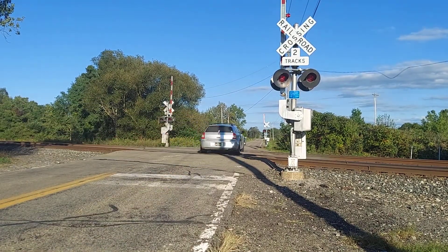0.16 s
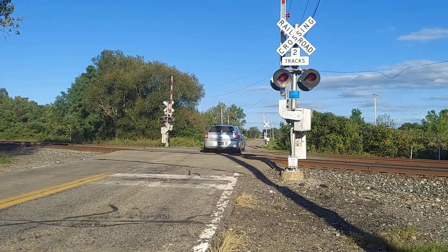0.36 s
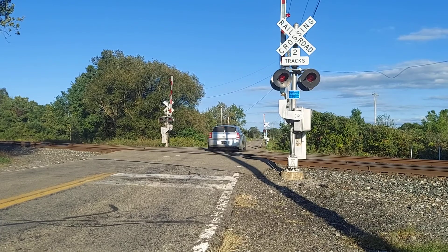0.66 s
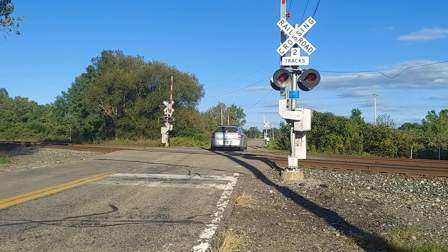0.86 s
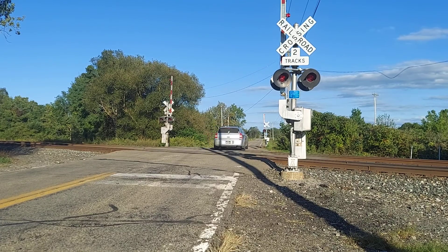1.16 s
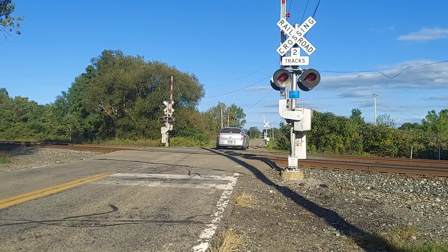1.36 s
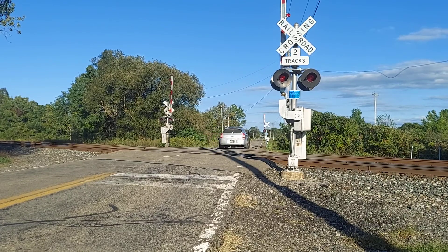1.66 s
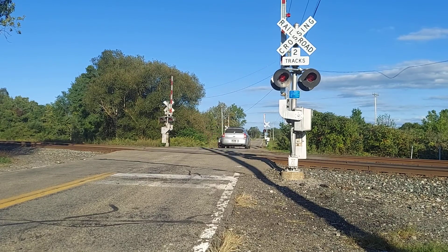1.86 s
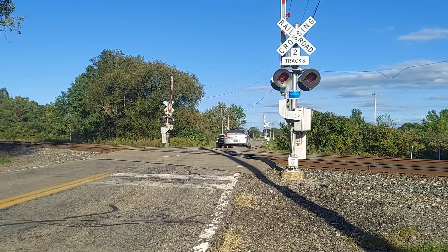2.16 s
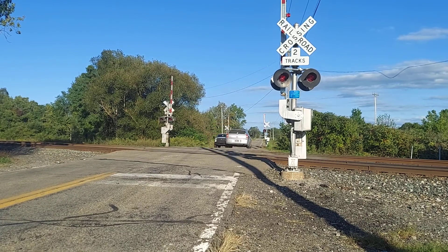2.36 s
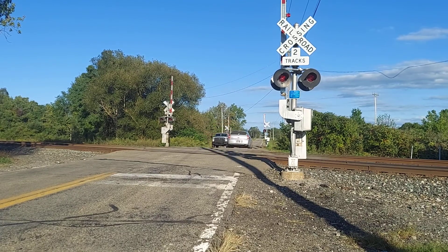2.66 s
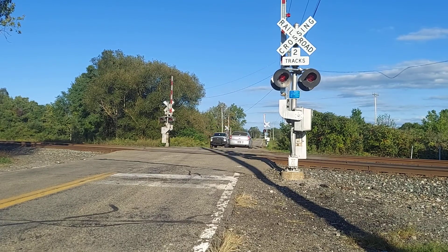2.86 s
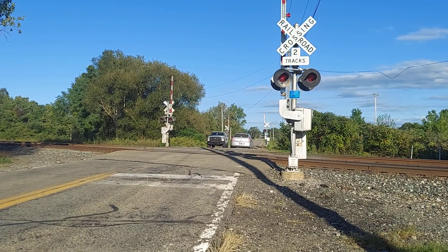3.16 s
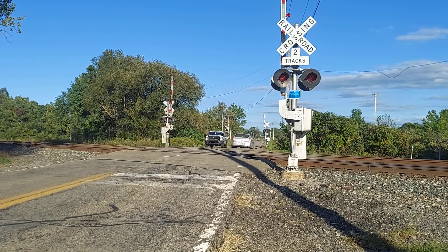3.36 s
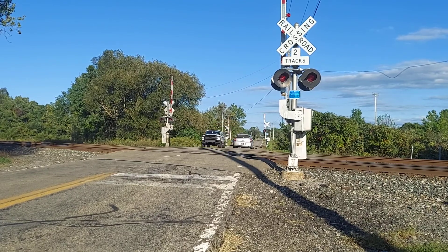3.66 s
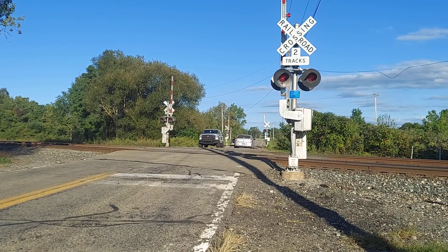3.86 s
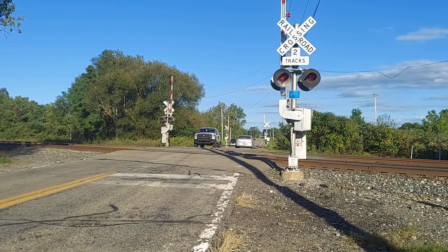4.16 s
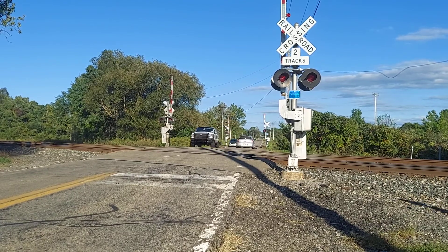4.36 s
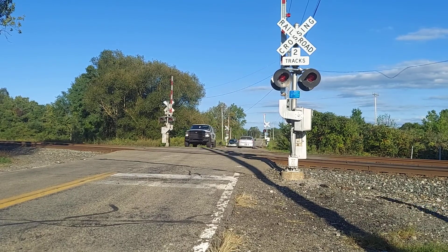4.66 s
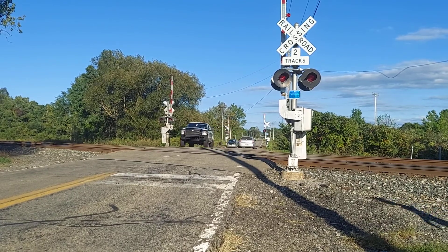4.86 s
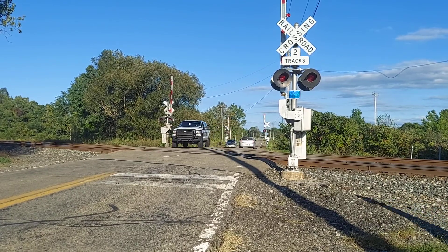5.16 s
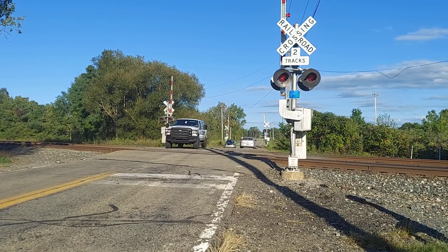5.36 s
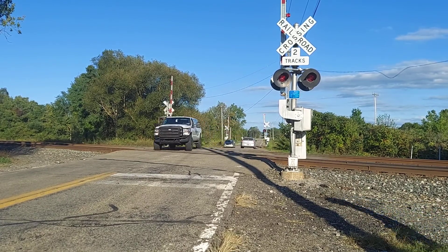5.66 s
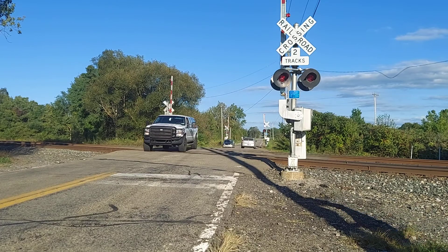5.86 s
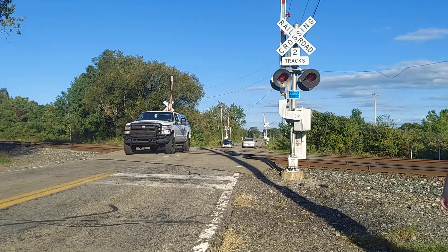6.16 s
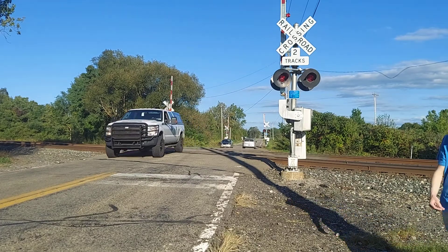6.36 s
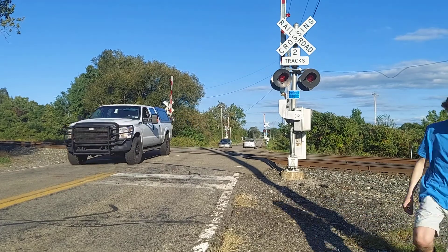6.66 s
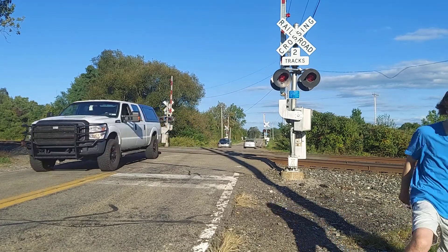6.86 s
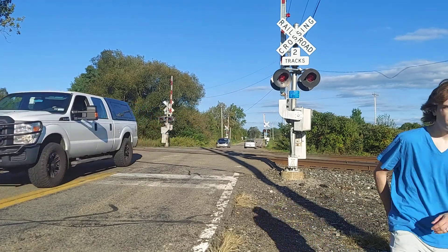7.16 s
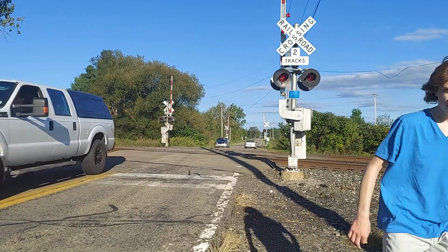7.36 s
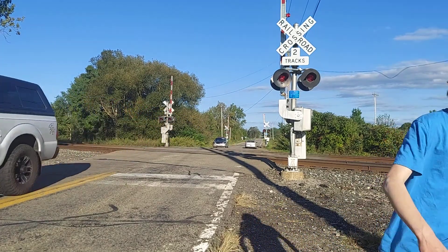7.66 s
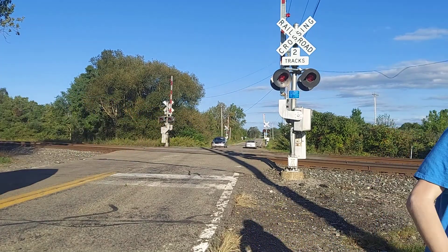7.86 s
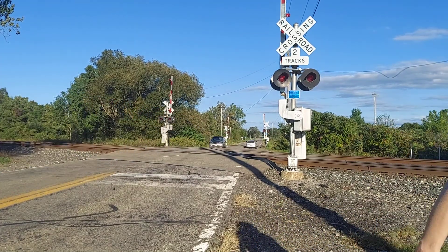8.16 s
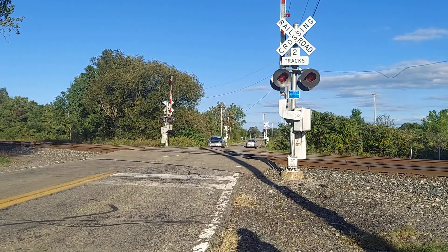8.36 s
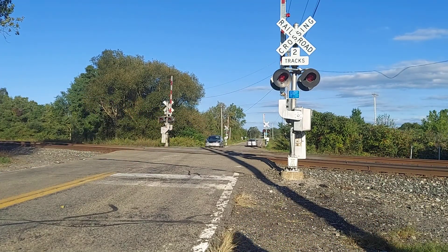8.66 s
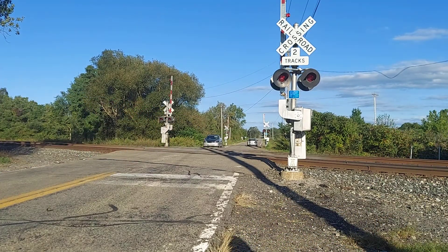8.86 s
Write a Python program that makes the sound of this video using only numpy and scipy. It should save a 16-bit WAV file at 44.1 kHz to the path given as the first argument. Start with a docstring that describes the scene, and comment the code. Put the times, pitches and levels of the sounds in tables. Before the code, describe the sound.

A few crunching gravel steps and small stone taps sound close to the microphone, over soft insects and a departing car on a rural road. Then a pickup truck draws near with rising rumble and tyre noise, clanks and thuds across the railroad tracks and goes by on the left. Its deep exhaust drone is loudest as it starts pulling away.

```python
"""Country road at a level crossing. A car has left; a pickup truck rolls over the rails and passes close
on the left. Tyres roar, wheels thump, the body clanks; the exhaust hums once the tail is near.
Crickets and katydids scrape their wings in the verge. On the right, steps crunch on gravel and stones
knock the stand of a small two-port microphone."""
import sys
import numpy as np
from scipy import signal
from scipy.fft import rfft, irfft
from scipy.io import wavfile
from scipy.ndimage import map_coordinates

SR = 44100
rng = np.random.default_rng(int(sys.argv[2]) if len(sys.argv) > 2 else 0)


def generate_wav(sig):
    """Save sig (samples, or channels by samples) to the path in sys.argv[1] as 16-bit PCM at SR."""
    pcm = np.round(np.clip(np.atleast_2d(sig).T, -1, 1) * 32767).astype(np.int16)
    wavfile.write(sys.argv[1], SR, pcm)


N = 396900

# noise spectra: (frequency [Hz], relative density [dB])
HUSH_SPECTRUM = [(18, -52), (30, -24), (66, 3.5), (123, -0.5), (197, -17.5), (243, -12), (324, -28),
                 (506, -8), (711, -24.5), (1260, -70), (1520, -26), (3160, -37), (4100, -24.5),
                 (4670, -33.5), (15600, -69)]
CAR_SPECTRUM = [(16, -29), (28, 7), (53, 6.5), (92, -9), (123, 5), (177, -23), (288, -7), (325, -14),
                (700, -27), (910, -62), (1540, -120)]
RUMBLE_SPECTRUM = [(15, -42), (25, -10), (59, 4), (76, 8), (108, 2), (146, 6.5), (185, 2.5), (238, -7.5),
                   (260, -26), (340, -37), (570, -120)]
ROAR_SPECTRUM = [(130, -10.5), (200, -2), (300, 0), (450, 2.5), (650, -2.5), (1000, -8), (1500, -13),
                 (2200, -21), (3000, -54)]
HISS_SPECTRUM = [(1100, 0), (1800, 1.5), (2800, 3.5), (4000, 0.5), (5500, -7.5), (7500, -13), (10000, -23),
                 (13000, -13.5), (15700, -32)]
# scattered sound, unlike at the two ports: (frequency [Hz], level re direct [dB])
SCATTER_SPECTRUM = [(60, -18), (250, -17), (600, -14), (1200, -11), (2000, -6), (3000, -4), (15000, -3)]

# cricket whistles: (time [s], pitch [Hz], level [dB])
TREE_CRICKET = [(0, 4020, -66), (.7, 4020, -62), (.85, 4020, -57.5), (4.4, 4020, -58), (9, 4020, -62)]
GROUND_CRICKET = [(0, 8100, -79), (3.6, 8120, -77), (4.1, 8300, -70), (5.5, 8430, -67), (6.5, 8500, -67),
                  (7.2, 8520, -72), (9, 8520, -77)]
# katydid wing resonances: (frequency [Hz], width [Hz], gain [dB])
WING_MODES = [(12500, 1800, 2.5), (13740, 2200, 5), (15150, 3000, 2.5)]
# ticks before a buzz: (time [s], relative peak [dB])
KATYDID_TICKS = [(1.0485, -51), (1.1179, -47), (1.1907, -52), (1.254, -45), (3.4885, -51), (3.6277, -48),
                 (3.717, -49), (3.7793, -45), (3.8362, -45), (5.444, -50), (5.5089, -48), (5.5762, -51),
                 (5.6366, -46), (5.6935, -44)]
# buzzes near and far: (start [s], end [s], end level [dB])
KATYDID_BUZZES = [(-.7, .22, -57.5), (.1, 1.25, -65), (1.24, 2.31, -54.5), (2, 2.72, -63), (3.8, 4.88, -55),
                  (4.6, 5.8, -63), (5.6, 6.64, -54.5), (6.9, 7.7, -61), (7.45, 8.53, -55), (8.2, 8.75, -63)]

# shoes on gravel: (peak time [s], level [dB], fall [s], centre [Hz])
GRAVEL_CRUNCHES = [(.02, -38.5, 0.078, 3240), (.24, -54, .03, 2490), (.355, -41.5, 0.014, 2570),
                   (.61, -43, 0.016, 3080), (.66, -44.5, .07, 2650), (.71, -50.5, 0.044, 3480),
                   (1.34, -52, 0.046, 2480), (1.372, -49, 0.012, 3020), (1.428, -45.5, .025, 2900),
                   (2.96, -57, .008, 4000), (3.2, -59, .012, 4000), (4.41, -57, .03, 10000),
                   (5.7, -61, .01, 7000), (6.356, -53, .004, 7000), (6.367, -44, 0.007, 7450),
                   (6.49, -53, .03, 7040), (6.676, -51, .006, 10100), (7.008, -47.5, .007, 11500),
                   (7.102, -32.5, .025, 4460), (7.103, -35, 0.03, 11100), (7.18, -46.5, .012, 9900),
                   (7.655, -51, .005, 10000), (7.828, -43, 0.029, 11600), (8.208, -44.5, .005, 11800),
                   (8.405, -45, 0.029, 11300)]
# crunch bandwidth: (centre [Hz], width / centre [ratio])
CRUNCH_WIDTHS = [(3000, 0.38), (9000, 2)]
# stones on the stand: (time [s], level [dB], mode tilt [dB/octave], T60 scale [ratio])
STONE_TAPS = [(.232, -47, -8, 1), (.347, -39.5, -2, .9), (.357, -43, -4, .9), (0.599, -56, 15, .9),
              (0.614, -48, 3, 1), (0.697, -52, 10, 1), (0.782, -33, 2, 0.16), (1.368, -43.5, 1, .9),
              (1.422, -42, -9, 0.85), (1.431, -41, -10, 0.77)]
# stand resonances: (frequency [Hz], gain [dB], T60 [s])
STAND_MODES = [(810, -1, 0.14), (1473, -0.5, 0.043), (1810, 10, 0.031), (2220, 9, 0.074), (2900, 4, 0.048),
               (3340, 8, .04), (5160, -24, .04)]

# traffic bearing: (time [s], left port lead [ms])
TRAFFIC_LEAD = [(0, -0.075), (2, -0.096), (5, -0.033), (6, -0.028), (6.6, 0.032), (7.1, 0.16), (7.5, 0.21),
                (8.2, 0.41), (9, 0.14)]
# leaving car: (time [s], level [dB])
CAR_LEVELS = [(0, -37), (.5, -41.5), (1, -45.5), (1.6, -45), (2.4, -48.5), (4, -56), (9, -66)]
# low traffic hums: (start [s], end [s], start pitch [Hz], end pitch [Hz], level [dB])
TRAFFIC_HUMS = [(-.3, 1.2, 122, 119, -43.5), (1.5, 2.34, 112, 131, -50), (.2, 1.8, 44.4, 48.3, -51),
                (3.4, 5.15, 112, 113, -41), (3.4, 6.2, 73, 77, -42), (5.8, 7.1, 77, 76, -36),
                (7.6, 8.6, 55, 53, -31), (7.7, 9.4, 71, 74, -32)]
# drone from the truck's front: (time [s], pitch [Hz], level [dB])
FRONT_DRONE = [(3.8, 148.3, -47), (5.2, 151, -37.5), (6.1, 151.1, -40), (6.8, 151.6, -27.5),
               (7.6, 151.3, -29.5), (8.3, 159, -31.5), (8.5, 160.2, -33)]
# exhaust, climbing as the truck pulls away: (time [s], firing rate [Hz], level [dB])
EXHAUST_FIRING = [(7.55, 110.9, -40), (7.75, 111.6, -23), (8.1, 113.1, -25), (8.54, 116.5, -16),
                  (9, 116.8, -17.5)]
# orders: (multiple of firing rate [ratio], level re firing note before, after the tail passes [dB])
EXHAUST_ORDERS = [(1.375, -17, -28), (2, -15, -38), (3, -17, -45), (4, -14.5, -25)]
# wheels over rails and joints: (time [s], level [dB])
WHEEL_THUMPS = [(2.02, -30), (2.33, -28), (3.68, -28), (4.72, -27), (5.07, -26), (6.42, -24), (6.955, -18),
                (7.475, -18)]
# body and wheel clanks: (time [s], level [dB], pitch [Hz])
BODY_CLANKS = [(5.901, -15, 560), (5.945, -27, 900), (5.997, -27, 700), (6.051, -25, 404),
               (6.093, -27, 573), (6.381, -23, 425), (6.463, -19, 380), (6.507, -26, 480),
               (7.424, -22, 452), (8.848, -26, 479)]
# truck pass: (time [s], body rumble [dB], tyre roar [dB], engine and tread hiss [dB])
TRUCK_LEVELS = [(0, -46.5, -50, -52.5), (1.4, -47.5, -51.5, -56.5), (2.3, -41, -51.5, -57),
                (2.9, -41, -50.5, -58), (3.7, -40, -45.5, -56), (4.8, -40.5, -39.5, -50),
                (5.6, -36.5, -37, -51), (6.0, -31, -32.5, -44.5), (6.3, -32.5, -32.5, -45),
                (6.7, -31, -30, -44), (7.4, -31, -28, -39.5), (7.95, -27, -26.5, -37), (8.4, -29, -29, -41),
                (9, -33, -32.5, -45)]

# port imbalance: (frequency [Hz], left minus right [dB])
PORT_BALANCE = [(60, 1.0), (92, -1.0), (140, -1.5), (210, 0.0), (330, -0.5), (500, -0.5), (770, 0.0),
                (1170, 1.5), (1790, 2.5), (2740, 5.0), (4190, 5.5), (6410, -1.5), (9810, -18.5),
                (15000, -13.0)]


def from_db(db):
    """Decibels to gain."""
    return 10 ** (np.asarray(db) / 20)


def unit_rms(x):
    """Scale to unit power."""
    return x / np.sqrt(np.mean(x ** 2) + 1e-20)


def curves(rows):
    """Columns of a time table, one value per sample."""
    times_s, *columns = np.transpose(rows)
    return [np.interp(np.arange(N) / SR, times_s, column) for column in columns]


def fade_in(end_s, length_s):
    """Quadratic rise from 0 to 1."""
    return np.clip((np.arange(N) / SR - end_s) / length_s + 1, 0, 1) ** 2


def at_hz(rows, hz):
    """Interpolate on a log-frequency axis."""
    knots_hz, values = np.transpose(rows)
    return np.interp(np.log(hz), np.log(knots_hz), values)


def drift(rate_hz):
    """Slow random wander of unit power."""
    hop = 40
    pole = np.exp(-2 * np.pi * rate_hz * hop / SR)
    slow = signal.lfilter([1], [1, -2 * pole, pole * pole], rng.standard_normal(N // hop + 2002))[2000:]
    return np.interp(np.arange(N) / hop, np.arange(len(slow)), unit_rms(slow))


def resonate(x, hz, width_hz):
    """One resonance, unit peak gain."""
    r = np.exp(-np.pi * width_hz / SR)
    feedback = [1, -2 * r * np.cos(2 * np.pi * hz / SR), r * r]
    return signal.lfilter([(1 - r * r) / 2, 0, (r * r - 1) / 2], feedback, x + 1e-18)


def noise(spectrum, flicker_db, flicker_hz):
    """Coloured noise, half-octave bands flickering partly together; rows (direct, scattered)."""
    hz = np.fft.rfftfreq(N, 1 / SR) + 1e-3
    low_hz, high_hz = spectrum[0][0], spectrum[-1][0]
    inside = (hz > low_hz) & (hz < high_hz)
    colour = rfft(rng.standard_normal((2, N))) * from_db(at_hz(spectrum, hz)) * inside
    colour[1] *= from_db(at_hz(SCATTER_SPECTRUM, hz))
    half_octaves = 2 * np.log2(hz / low_hz)
    out, common = 0, drift(flicker_hz)
    for k in range(int(2 * np.log2(high_hz / low_hz)) + 2):
        band = np.cos(np.pi / 2 * np.clip(half_octaves - k, -1, 1)) ** 2
        out += irfft(colour * band, N) * from_db(flicker_db * (0.39 * common + drift(flicker_hz)))
    return unit_rms(out)


def tone(hz, waver_rad):
    """Sine near unit power, wavering in phase and level."""
    phase = 2 * np.pi * np.cumsum(hz) / SR + waver_rad * drift(9.8)
    return np.sqrt(2) * np.sin(phase) * from_db(1.7 * waver_rad * drift(2.1))


def at_ports(direct, scattered, lead_ms):
    """Rows (left, right): left leads by lead_ms; scattered sound enters with opposite signs."""
    read_at = np.arange(N) + lead_ms * SR / 1000
    left = map_coordinates(direct + scattered, [read_at], order=3, mode="nearest")
    return np.array([left, direct - scattered])


def country_hush():
    """Distant, mostly low noise; rows (direct, scattered)."""
    return from_db(-49) * noise(HUSH_SPECTRUM, flicker_db=3.0, flicker_hz=3.6)


def wing_strokes(rate_hz, sharpness):
    """Near-regular throb of unit power."""
    phase = 2 * np.pi * rate_hz * np.arange(N) / SR + .8 * drift(1.5)
    return unit_rms(np.exp(sharpness * np.cos(phase)))


def cricket(rows, stroke_hz, sharpness, jitter, wander_hz):
    """A whistle chopped by wing strokes."""
    hz, level_db = curves(rows)
    throb = wing_strokes(stroke_hz, sharpness)
    pitch_hz = hz * (1 + jitter * drift(120)) + wander_hz * drift(4)
    return from_db(level_db) * throb * tone(pitch_hz, waver_rad=.25)


def buzz_envelope(attack_s=.3, release_s=.06, swell_db_per_s=3.5, chorus_db=-70):
    """Each buzz swells and cuts off; powers add over a faint chorus."""
    t, power = np.arange(N) / SR, from_db(chorus_db) ** 2
    for start_s, end_s, level_db in KATYDID_BUZZES:
        gate = np.clip((t - start_s) / attack_s, 0, 1) * np.exp(np.minimum(end_s - t, 0) / release_s)
        swell = from_db(level_db + swell_db_per_s * np.minimum(t - end_s, 0))
        power += (gate * swell) ** 2
    return np.sqrt(power)


def katydids(tick_t60_s=0.057):
    """Ticks and raspy buzzes through the same wing resonances; independent rasp at each port."""
    scrape = rng.standard_normal((2, N))
    rasp = sum(from_db(gain_db) * resonate(resonate(scrape, hz, width_hz), hz, width_hz)
               for hz, width_hz, gain_db in WING_MODES)
    ticks = np.zeros(N)
    for time_s, peak_db in KATYDID_TICKS:
        ticks[round(time_s * SR)] = from_db(peak_db - 7)
    ticks = signal.lfilter([1], [1, -from_db(-60 / (tick_t60_s * SR))], ticks)
    return unit_rms(rasp) * (buzz_envelope() * wing_strokes(44.0, sharpness=0.29) + ticks)


def gravel_steps(clicks_per_s=12000, chink_db=-11):
    """Stones slip underfoot in dense uneven clicks and chink; rows (direct, scattered)."""
    out, t = np.zeros((2, N)), np.arange(N) / SR
    sizes = from_db(2.5 * np.minimum(rng.exponential(1, (2, N)), 5)) * rng.choice([-1, 1], (2, N))
    clicks = sizes * (rng.random((2, N)) < clicks_per_s / SR) * from_db([[0], [-3]])
    for peak_s, level_db, fall_s, hz in GRAVEL_CRUNCHES:
        rise_s, width_hz = 0.71 * fall_s, at_hz(CRUNCH_WIDTHS, hz) * hz
        span = slice(max(round((peak_s - 5 * rise_s) * SR), 0), round((peak_s + 6 * fall_s) * SR))
        age_s = t[span] - peak_s
        press = np.exp(np.where(age_s < 0, age_s / rise_s, -age_s / fall_s))
        grit = unit_rms(resonate(resonate(clicks[:, span], hz, width_hz), hz, width_hz))
        stones_hz = np.minimum(hz * 2 ** rng.uniform(-0.57, 0.5, 4), .4 * SR)
        chink = unit_rms(sum(resonate(clicks[:, span], stone_hz, 0.023 * hz) for stone_hz in stones_hz))
        out[:, span] += from_db(level_db) * press * (grit + from_db(chink_db) * chink)
    return out


def stand_taps(contact_s=.0003):
    """Stones knock the stand; each mode rings with random strength and phase."""
    out, t = np.zeros(N), np.arange(SR // 5) / SR
    for time_s, tap_db, tilt_db_per_oct, t60_scale in STONE_TAPS:
        for hz, mode_db, t60_s in STAND_MODES:
            random_db, phase = rng.standard_normal(2) * [3, 2]
            gain = from_db(tap_db + mode_db + tilt_db_per_oct * np.log2(hz / 1500) + random_db)
            envelope = (1 - np.exp(-t / contact_s)) * from_db(-60 * t / (t60_scale * t60_s))
            out[round(time_s * SR):][:len(t)] += gain * envelope * np.sin(2 * np.pi * hz * t + phase)
    return out


def leaving_car():
    """Low fading rush; rows (direct, scattered)."""
    level_db, = curves(CAR_LEVELS)
    return from_db(level_db) * noise(CAR_SPECTRUM, flicker_db=0.6, flicker_hz=20.0)


def traffic_hums():
    """Low tones that swell, glide and fade."""
    out, t = np.zeros(N), np.arange(N) / SR
    for start_s, end_s, start_hz, end_hz, level_db in TRAFFIC_HUMS:
        swell = np.sin(np.pi * np.clip((t - start_s) / (end_s - start_s), 0, 1)) ** .5
        hz = np.interp(t, [start_s, end_s], [start_hz, end_hz])
        out += from_db(level_db) * swell * tone(hz, waver_rad=.35)
    return out


def front_drone():
    """Rough tone from the front of the truck."""
    hz, level_db = curves(FRONT_DRONE)
    gate = fade_in(FRONT_DRONE[0][0], length_s=0.65) * (1 - fade_in(end_s=9.0, length_s=0.65))
    return from_db(level_db) * gate * tone(hz, waver_rad=.75)


def exhaust():
    """Firing note plus orders from uneven cylinders; the orders drop as the tail passes."""
    firing_hz, level_db = curves(EXHAUST_FIRING)
    passed = fade_in(end_s=8.6, length_s=0.33)
    note = tone(firing_hz, waver_rad=0.1)
    for order, before_db, after_db in EXHAUST_ORDERS:
        order_db = before_db + passed * (after_db - before_db)
        note += from_db(order_db) * tone(order * firing_hz, waver_rad=0.96)
    return from_db(level_db) * fade_in(EXHAUST_FIRING[0][0], length_s=0.15) * note


def impacts(rows, t60_s, grit_gain, rise_cycles):
    """Each blow swells briefly and decays at its pitch, smeared by dull noise."""
    out = np.zeros(N)
    for time_s, level_db, hz in rows:
        start = round(time_s * SR)
        t = np.arange(min(round(t60_s * SR), N - start)) / SR
        envelope = (1 - np.exp(-t * hz / rise_cycles)) ** 2 * from_db(-60 * t / t60_s)
        grit = rng.standard_normal(SR // 2)
        for _ in range(3):
            grit = resonate(grit, hz, 2.0 * hz)
        ring = np.sin(2 * np.pi * hz * t) + grit_gain * unit_rms(grit)[-len(t):]
        out[start:start + len(t)] += from_db(level_db) * envelope / envelope.max() * ring
    return out


def wheel_thumps(pitch_hz=65):
    """Wheels hit rails and joints; rubber keeps the blows dull."""
    rows = [(time_s, level_db, pitch_hz) for time_s, level_db in WHEEL_THUMPS]
    return impacts(rows, t60_s=.39, grit_gain=.2, rise_cycles=0.79)


def body_clanks():
    """Short noisy knocks of the truck's body and wheels."""
    return impacts(BODY_CLANKS, t60_s=.026, grit_gain=.8, rise_cycles=0.29)


def truck_rolling():
    """Body rumble, tyre roar, engine and tread hiss; rows (direct, scattered)."""
    rumble_db, roar_db, hiss_db = curves(TRUCK_LEVELS)
    rumble = from_db(rumble_db) * noise(RUMBLE_SPECTRUM, flicker_db=2.0, flicker_hz=5.6)
    roar = from_db(roar_db) * noise(ROAR_SPECTRUM, flicker_db=1.43, flicker_hz=8.9)
    hiss = from_db(hiss_db) * noise(HISS_SPECTRUM, flicker_db=1.36, flicker_hz=15.0)
    return rumble + roar + hiss


def scene():
    """Traffic moves from ahead to the left; steps and insects stay put. Rows (left, right)."""
    lead_ms, = curves(TRAFFIC_LEAD)
    direct, scattered = truck_rolling() + leaving_car()
    direct += wheel_thumps() + traffic_hums() + body_clanks()
    traffic = at_ports(direct, scattered, lead_ms)
    engine_pan_db = [[-1], [1]] * fade_in(end_s=8.7, length_s=.7)   # leans right as the tail passes
    engine = at_ports(exhaust() + front_drone(), 0, lead_ms) * from_db(engine_pan_db)
    crunch, crunch_scattered = gravel_steps()
    steps = at_ports(crunch + stand_taps(), crunch_scattered, lead_ms=-0.14) * from_db([[-.3], [.3]])
    tree = cricket(TREE_CRICKET, stroke_hz=43.5, sharpness=1.2, jitter=.001, wander_hz=15)
    ground = cricket(GROUND_CRICKET, stroke_hz=58.5, sharpness=1.0, jitter=.01, wander_hz=8)
    crickets = tree * from_db([[-4], [0]]) + ground * from_db([[-6], [.4]])
    buzz = katydids() * from_db([[-2.5], [.4]])
    hush = at_ports(*country_hush(), lead_ms=-0.044) 
    return hush + crickets + buzz + steps + engine + traffic


def record(dry, bass_cut_hz=48, top_cut_hz=15900):
    """Small microphone: housing rings, band is limited; left loses high treble, right upper mids."""
    rung = dry + from_db(7) * resonate(dry, hz=1510, width_hz=62)
    thinned = signal.sosfilt(signal.butter(2, bass_cut_hz, "high", fs=SR, output="sos"), rung)
    pad = SR // 10   # against clicks at the ends
    padded = np.pad(thinned, [(0, 0), (pad, pad)], "reflect", reflect_type="odd")
    balance_db = at_hz(PORT_BALANCE, np.fft.rfftfreq(N + 2 * pad, 1 / SR) + 1e-3)
    left_gain = np.sqrt(2 / (1 + from_db(-2 * balance_db)))   # constant total power
    right_gain = left_gain / from_db(balance_db)
    ports = irfft(rfft(padded) * [left_gain, right_gain], N + 2 * pad)[:, pad:pad + N]
    return signal.sosfilt(signal.cheby2(30, 70, top_cut_hz, fs=SR, output="sos"), ports)


dry = scene()
out = record(dry)
generate_wav(out)
```